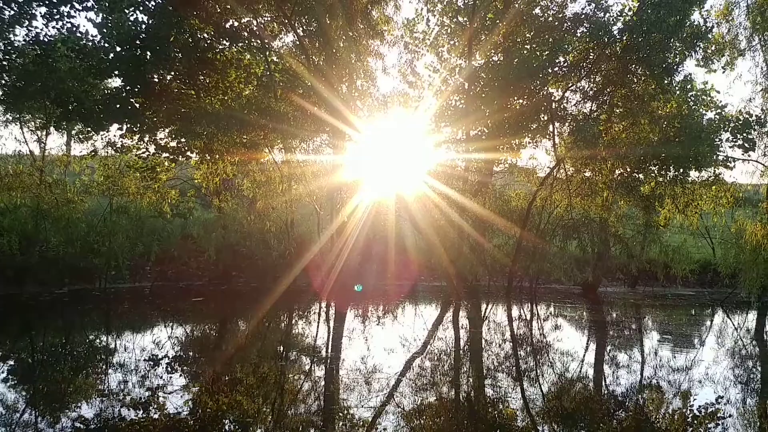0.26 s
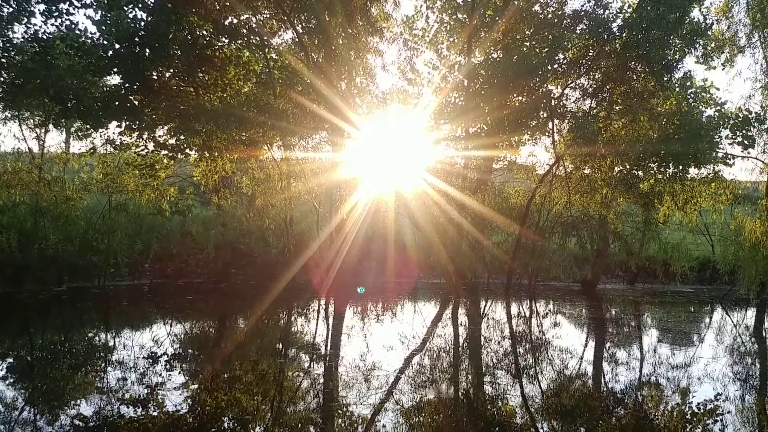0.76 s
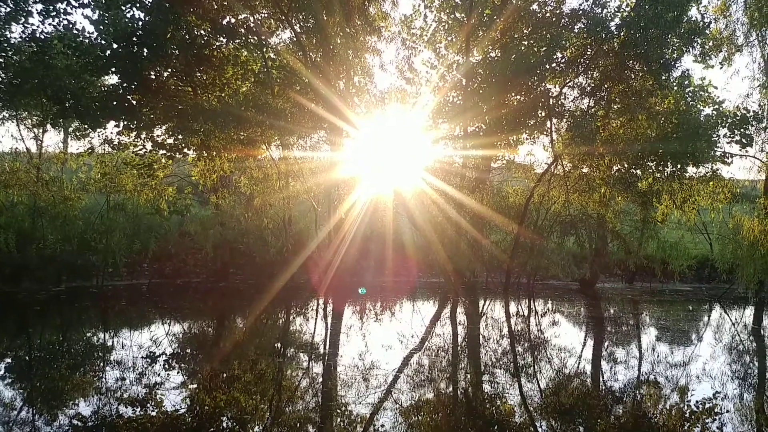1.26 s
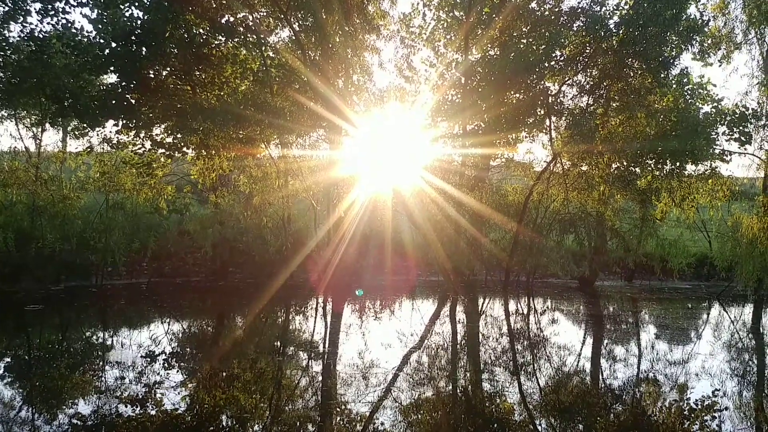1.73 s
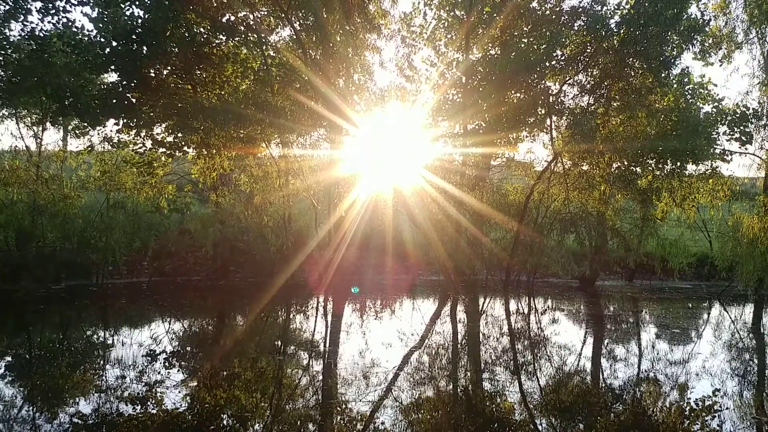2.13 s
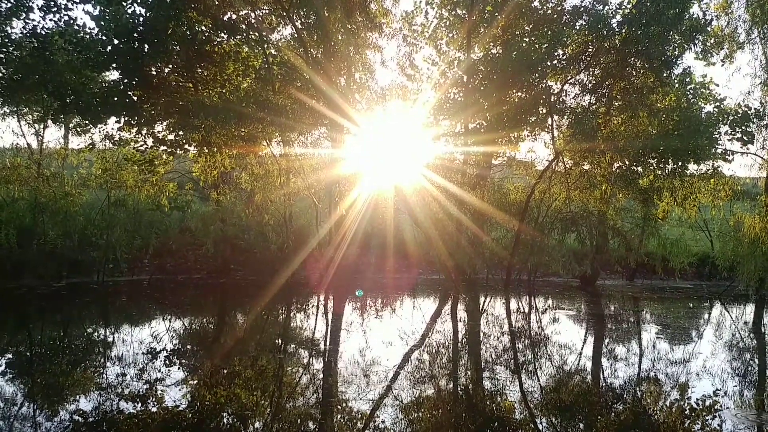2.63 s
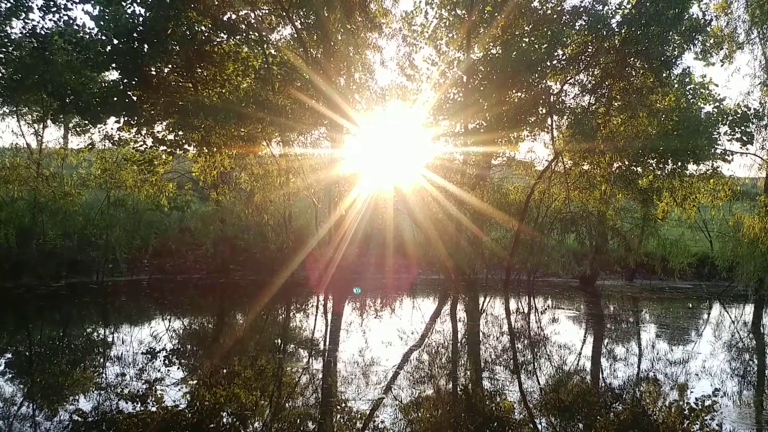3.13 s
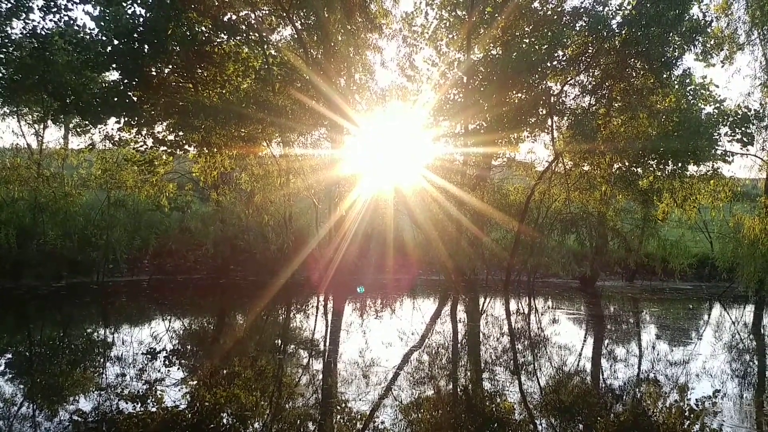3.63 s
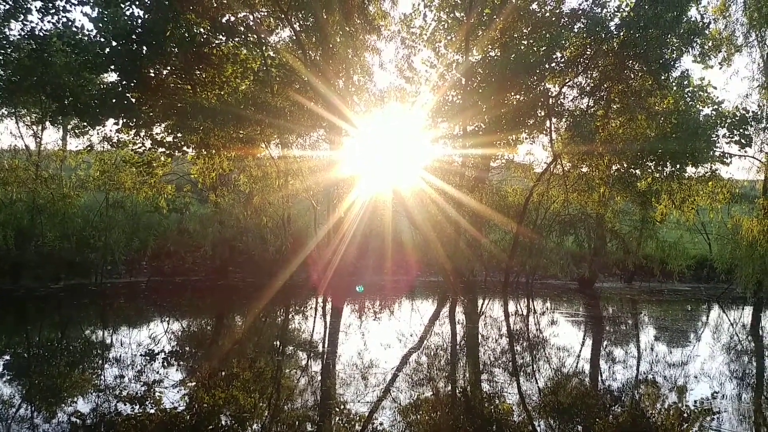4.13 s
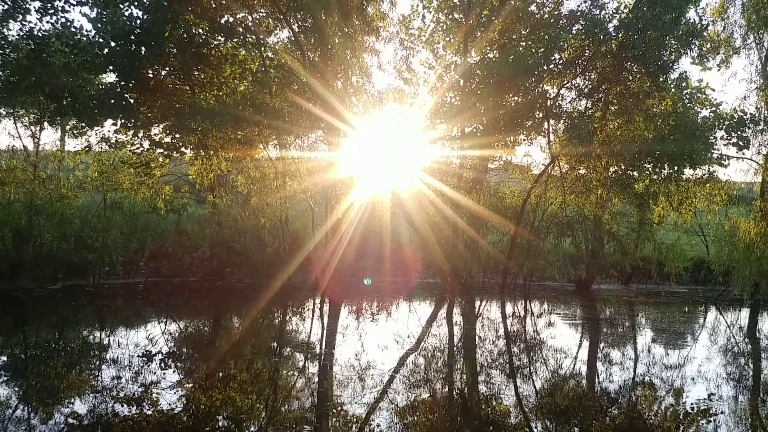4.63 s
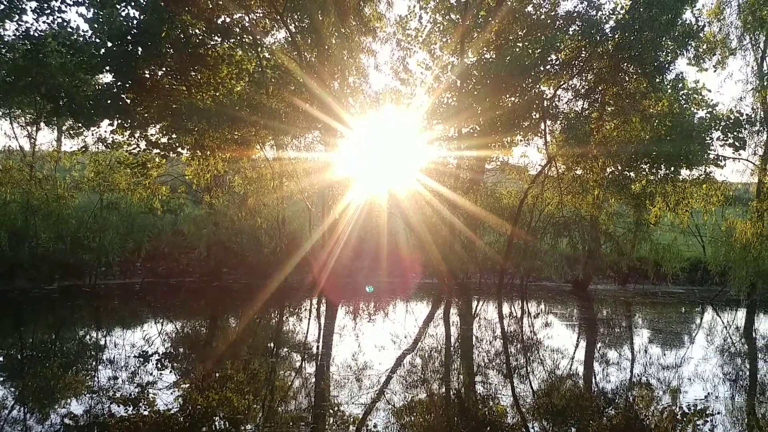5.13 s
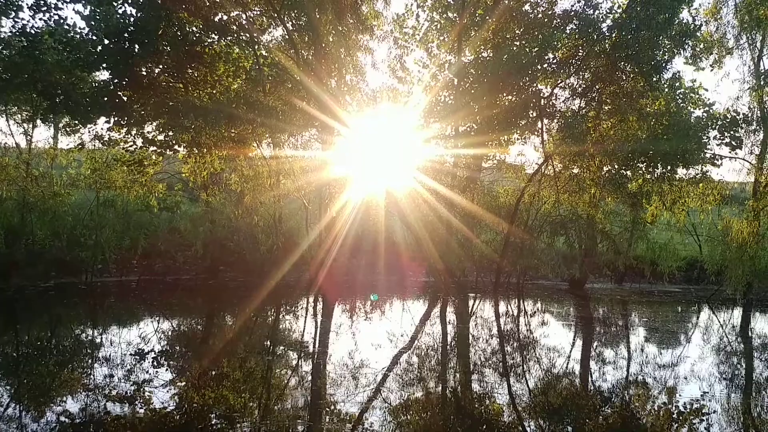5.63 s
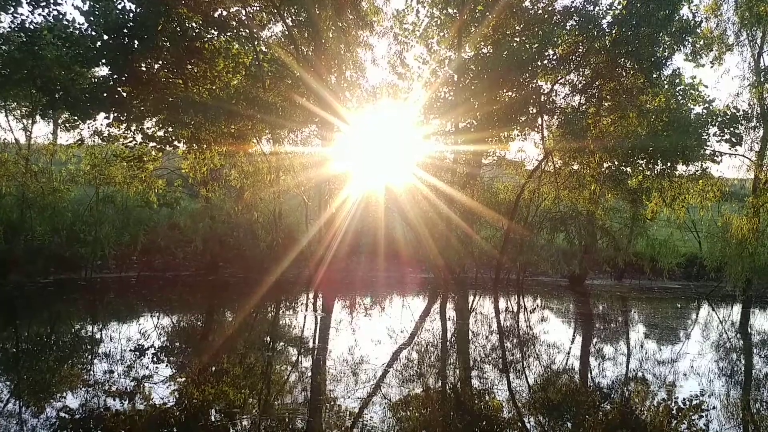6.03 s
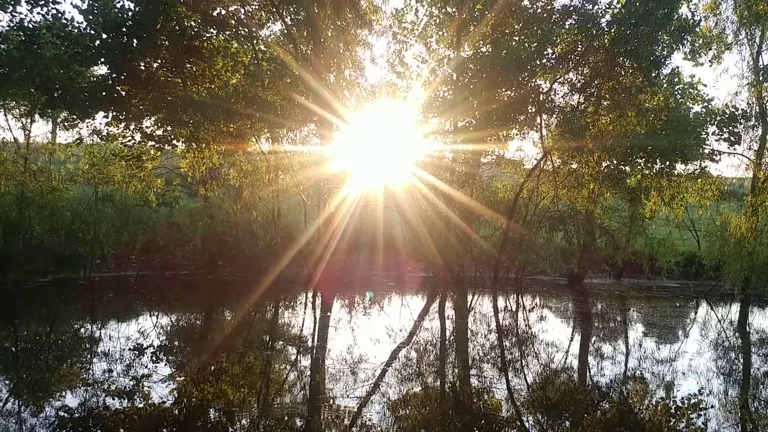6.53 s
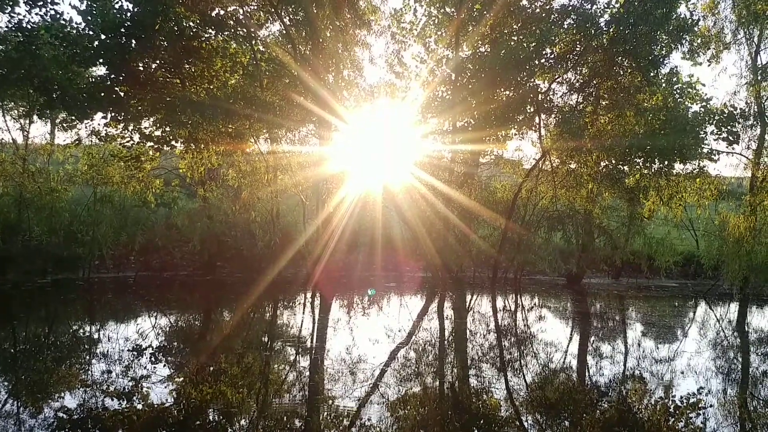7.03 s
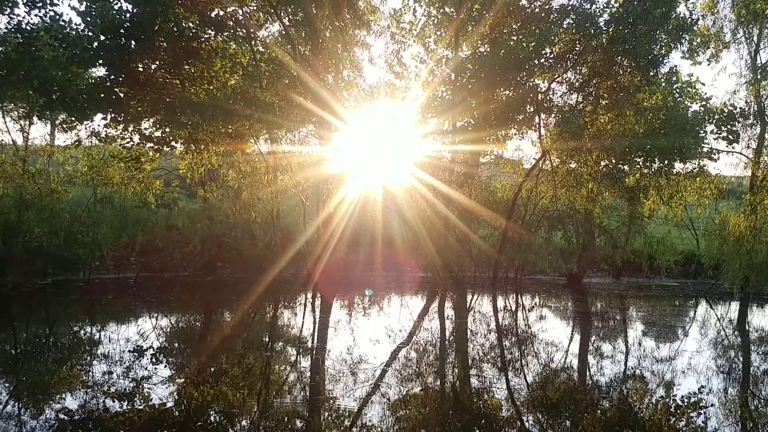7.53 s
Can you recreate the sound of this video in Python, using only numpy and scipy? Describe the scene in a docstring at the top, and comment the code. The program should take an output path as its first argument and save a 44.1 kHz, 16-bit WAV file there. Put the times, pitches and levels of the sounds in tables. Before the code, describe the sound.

Cicadas buzz high and steady by a pond, a near one swelling then holding, with a faint cricket and one distant crow caw.

```python
"""Evening at a pond among trees

A far chorus of cicadas buzzes; a near one warms up in swells, then holds its song, and a neighbour joins.
Their sound is a train of clicks from buckling ribs, coloured by the resonances of the belly.
A katydid throbs and a far cricket chirps, both by rubbing their wings. A crow calls once, water plops,
a brief tone blips, and far traffic rumbles and whines. Trees add echoes. The treble differs between
left and right, and the right side falls silent above about 13 kHz."""
import sys
import numpy as np
from scipy import signal
from scipy.fft import rfft, irfft, next_fast_len
from scipy.io import wavfile
from scipy.ndimage import map_coordinates

SR = 44100
rng = np.random.default_rng(int(sys.argv[2]) if len(sys.argv) > 2 else 0)


def persist_wave(psi):
    """Save psi, clipped to +-1, as 16-bit WAV."""
    counts = np.round(np.clip(psi, -1, 1) * 32767).astype(np.int16)
    wavfile.write(sys.argv[1], SR, np.atleast_2d(counts).T)


N = 342657

# The near cicada's muscle cycle (both drums buckle once), slowing as the song settles: time_s, rate_hz
MUSCLE_CYCLE = [(1.6, 157.6), (2.6, 157.2), (3.3, 155.5), (3.65, 156.1), (3.95, 152.8), (4.3, 152.4),
                (7.77, 152.2)]


def amp(db):
    """Decibels as an amplitude ratio."""
    return 10 ** (np.asarray(db) / 20)


def unit(x):
    """Scaling to unit RMS."""
    return x / np.sqrt(np.mean(x ** 2) + 1e-20)


def along(points, hz):
    """Interpolation of (frequency_hz, value) points on a log frequency axis."""
    f, v = np.transpose(points)
    return np.interp(np.log(hz + 1), np.log(f + 1), v)


def curves(rows):
    """Linear interpolation of each column after time_s, one value a sample."""
    s, *cols = np.transpose(rows)
    return [np.interp(np.arange(N) / SR, s, c) for c in cols]


def wobble(rate_hz):
    """Smooth random modulation: a spline through rate_hz knots a second."""
    coarse = np.arange(0, N + 32, 32)
    knots = rng.standard_normal(int(N * rate_hz / SR) + 4)
    return np.interp(np.arange(N), coarse, map_coordinates(knots, [coarse * rate_hz / SR]))


def filtered(x, response):
    """Linear filtering: the spectrum times a complex frequency response."""
    m = next_fast_len(N + SR // 2)
    return irfft(rfft(x, m) * response(np.fft.rfftfreq(m, 1 / SR)), m)[..., :N]


def among_trees(x, lag_s, wet_db):
    """Delay and scattering: x reaches the right later; trunks and leaves give each side its own tail."""
    # Reverberation time: frequency_hz, t60_s
    decay = [(500, 0.166), (2000, 0.68), (8000, 0.165)]
    hz, t, noise = signal.stft(rng.standard_normal((2, SR // 2)), SR, nperseg=256)
    tail = signal.istft(noise * amp(-60 * t / along(decay, hz)[:, None]), SR, nperseg=256)[1]
    wet = signal.fftconvolve(np.atleast_2d(x), tail / np.linalg.norm(tail[0]), axes=1)[:, :N]
    direct = filtered(x, lambda f: np.exp(-2j * np.pi * f * np.array([[0], [lag_s]])))
    return direct + amp(wet_db) * wet


def traffic():
    """Narrow-band engine hum over broadband rumble and air, coherent between the sides only in the bass."""
    # Engine hum: time_s, level_db
    hum_level = [(0, -65), (.56, -60), (1, -68), (1.7, -58), (1.9, -66), (3.35, -59), (4.7, -58),
                 (4.8, -65), (5.13, -57), (5.63, -66), (6.2, -59), (6.4, -65), (7.12, -59), (7.77, -62)]
    # Spectrum of rumble and air: frequency_hz, relative_db
    spectrum = [(15, -64), (30, -18.5), (50, -6.5), (70, -3.5), (110, -5.5), (180, -12.5), (295, -24.5),
                (540, -23.5), (1000, -28), (1650, -57), (2550, -30.5), (3500, -56)]
    # Likeness of left and right: frequency_hz, correlation
    coherence = [(60, 0.976), (150, 0.975), (300, 1), (600, 0.22), (1500, 0.026)]
    spread = lambda hz: np.arccos(np.clip(along(coherence, hz), -1, 1)) / 2
    colour = lambda hz: amp(along(spectrum, hz)) * [np.cos(spread(hz)), np.sin(spread(hz))]
    mid, side = filtered(rng.standard_normal((2, N)), colour)
    drone = lambda hz: 1 / (1 + ((hz - 81) / 8) ** 2) + 0.069 / (1 + ((hz - 172) / 6) ** 2)
    hum = unit(filtered(rng.standard_normal(N) + 0.134 * rng.standard_normal((2, N)), drone))
    rumble = amp(-59.5 + 0.34 * wobble(3.08)) * unit(np.array([mid + side, mid - side]))
    return rumble + amp(curves(hum_level)[0]) * hum


def motor_whine(start_s=0.49, length_s=1.5, fundamental_hz=502, climb_hz_per_s=13):
    """Harmonics two and three of a distant motor glide upward, fading in and out."""
    t = np.arange(N) / SR - start_s
    phase = 2 * np.pi * np.cumsum(fundamental_hz + climb_hz_per_s * t + 2.15 * wobble(14)) / SR
    fade = np.sqrt(np.abs(np.sin(np.pi * np.clip(t / length_s, 0, 1))))
    return fade * amp(-82 + 1.5 * wobble(11.4)) * (np.sin(3 * phase) + 0.5 * np.sin(2 * phase))


def plop(start_s=3.41, pitch_hz=510, t60_s=.15):
    """A damped oscillation, rising slightly in pitch: one soft plop from the water."""
    t = np.clip(np.arange(N) / SR - start_s, 0, 1)
    envelope = amp(-63 - 60 * t / t60_s) * (1 - np.exp(-t / .004))
    return envelope * np.sin(2 * np.pi * pitch_hz * t * (1 + .6 * t))


def tone_blip(start_s=7.187, length_s=0.0265, pitch_hz=3100):
    """A sine under a half-sine envelope: one brief tone blip."""
    t = np.clip(np.arange(N) / SR - start_s, 0, length_s)
    return amp(-51) * np.sin(np.pi * t / length_s) * np.sin(2 * np.pi * pitch_hz * t)


def crow(start_s=4.046, attack_s=0.0243, hold_s=0.12, release_s=0.033, top_s=4.125, top_hz=598):
    """A harmonic series on an arched pitch, made hoarse by random modulation; the far bank reflects it."""
    # Partials of the voice: harmonic, relative_db
    throat = [(1, -13.5), (2, 2.5), (3, 1), (4, -12.5)]
    t = np.arange(N) / SR
    pitch_hz = np.clip(top_hz - 125 * (10 * (t - top_s)) ** 2, 0, None)
    breath = np.interp(t - start_s, np.cumsum([0, attack_s, hold_s, release_s]), [0, 1, 1, 0])
    phase = 2 * np.pi * np.cumsum(pitch_hz) / SR + 0.15 * wobble(130)
    voice = breath * sum(amp(-47.5 + db + 2.2 * wobble(45)) * np.sin(k * phase) for k, db in throat)
    bank_echo = amp(-11) * np.roll(voice, round(.075 * SR))
    return among_trees(voice + bank_echo, lag_s=0.00036, wet_db=-10)


def cricket(stroke_s=0.045, spacing_s=.056):
    """Stridulation: three raspy wing strokes a chirp, the last faint, the tone sinking through each."""
    # Chirps: time_s, level_db, nominal_pitch_hz
    chirps = [(0.1994, -66, 2330), (0.7557, -63.5, 2311), (1.0221, -61, 2330), (1.2765, -61, 2297),
              (1.5424, -62, 2333), (2.3136, -67, 2380), (2.594, -59, 2367), (2.842, -60.5, 2330),
              (3.1093, -59.5, 2360), (3.4, -61.5, 2307), (4.0297, -59, 2322), (4.2976, -60, 2361),
              (4.562, -60.5, 2350)]
    song, t = np.zeros(N + SR), np.arange(int(stroke_s * SR)) / SR
    envelope = np.sqrt(np.abs(np.sin(np.pi * t / t[-1])))
    for time_s, db, hz in chirps:
        for k, stroke_db in enumerate([0, -.5, -10]):
            stroke_hz = hz + rng.normal(0, 15.3)
            tone = np.sin(2 * np.pi * stroke_hz * (1.02 * t - rng.uniform(0.281, 0.574) * t * t))
            onset = round((time_s - .006 + spacing_s * k) * SR)
            song[onset:][:len(t)] += amp(db + stroke_db) * envelope * tone
    rasp = 0.89 + 0.568 * wobble(330)
    return among_trees(song[:N] * rasp, lag_s=0.00034, wet_db=-11)


def katydid(throb_hz=10.19, resonance_hz=10300):
    """Amplitude modulation: a wing rasp in one broad resonance, pressed at a steady beat."""
    # The rasp: time_s, level_db
    level = [(0, -50), (1.3, -39.5), (2, -41.5), (2.8, -43.5), (4.5, -40), (6.2, -35), (7.77, -34.5)]
    beat = throb_hz * (np.arange(N) / SR - .027) + 0.067 * wobble(1.88)
    press = 0.5 + (.5 + .5 * np.cos(2 * np.pi * beat)) ** 2
    rasp = press * amp(2.66 * wobble(7.3)) * rng.standard_normal((2, N))
    resonance = lambda hz: 1 / (1 + ((hz - resonance_hz) / 800) ** 4)
    return amp(curves(level)[0]) * unit(filtered(rasp, resonance))


def drums(cycle_hz, second_drum_cycles, noise_share, jitter_cycles):
    """Impulse excitation: each buckling rib of a cicada's two drums gives a click and a puff of noise."""
    # The two ribs of a drum: delay_cycles, relative_db
    ribs = [(0, 0), (.24, -7)]
    cycles = np.cumsum(cycle_hz) / SR + rng.random()
    clicks, puffs = np.zeros(N + 16), np.zeros(N)
    taps = np.arange(-7, 9)
    for start in (0, second_drum_cycles):
        for delay, db in ribs:
            phase = cycles - start - delay
            whole = np.arange(np.ceil(phase[8]), phase[-1])
            buckles = whole + jitter_cycles * rng.standard_normal(len(whole))
            at = np.clip(np.interp(buckles, phase, np.arange(N)), 8, N)
            spots = at.astype(int)[:, None] + taps
            gap = spots - at[:, None]
            size = amp(db + 0.62 * rng.standard_normal(len(whole)))[:, None]
            pulses = size * np.sinc(gap) * np.cos(np.pi * gap / 16) ** 2  # band-limited impulses
            clicks += np.bincount(spots.ravel(), pulses.ravel(), N + 16)
            puffs += amp(db) * np.exp(-((phase % 1 - .2) / .085) ** 2)
    # the clicks keep their shape best around the belly's lowest resonance
    belly = filtered(unit(clicks[:N]), lambda hz: .5 + 0.154 / (1 + ((hz - 4100) / 700) ** 4))
    air = rng.standard_normal((2, N)) + 0.38 * rng.standard_normal(N)  # scatters differently to each side
    return np.sqrt(1 - noise_share) * belly + np.sqrt(noise_share) * unit(puffs * air)


def far_chorus(singers=5):
    """Incoherent summation: cicadas at their own rates and places, blurred by reverberation."""
    # Colour of the chorus: frequency_hz, relative_db
    spectrum = [(2400, -45.5), (3230, -32.5), (3330, -19.5), (3650, -13), (4200, -10), (4360, -7.5),
                (4550, -9.5), (5200, -20.5), (6300, -16), (7700, 2), (8500, -2.5), (9100, -20), (10300, -2),
                (11700, 0), (12900, -10), (14000, -38), (15500, -26)]
    # The whole chorus: time_s, level_db
    level = [(0, -26), (.35, -29), (1.4, -29.5), (2.4, -30), (3.3, -30.5), (4, -33), (7.77, -28)]
    crowd = 0
    for pace, side in rng.standard_normal((singers, 2)):
        cycle_hz = (157 + 6 * pace) * (1 + .004 * wobble(.7))
        buzz = drums(cycle_hz, second_drum_cycles=.51, noise_share=0.78, jitter_cycles=0.002)
        flicker = amp(1.35 * wobble(2.995) + 1.67 * wobble(9))
        crowd = crowd + among_trees(flicker * buzz, lag_s=0.0004084 * (1 + 0.082 * side), wet_db=2)
    return amp(curves(level)[0]) * unit(filtered(crowd, lambda hz: amp(along(spectrum, hz))))


def partials(fundamental_hz, table, flicker_db, blur_rad):
    """Line broadening: each (harmonic, level_db) partial flickers in level and phase on its own."""
    phase = 2 * np.pi * np.cumsum(fundamental_hz) / SR
    return sum(amp(db + flicker_db * wobble(14)) * np.sin(k * phase + blur_rad * wobble(22))
               for k, db in table)


def belly_tones(effort, neighbour_hz=153.3):
    """Resonance: thin, broken tones ring out of the near cicada, its neighbour and one far singer."""
    # The near cicada's upper and low partials: harmonic, relative_db
    upper_tones = [(24, -9), (26, -13), (28, -1.5), (29, -7), (33, -9)]
    low_tones = [(18, -44), (19, -61), (20, -40.5), (22, -39)]
    # How clearly its belly rings on the upper ones: time_s, gain_db
    ringing = [(2, -20), (3.3, -13), (3.75, -14.5), (3.92, -23), (4.02, -11.5), (4.18, -12.5), (4.28, -24),
               (4.36, -12), (4.65, -11.5), (5.3, -14), (5.8, -17), (6.3, -17), (6.75, -17.5), (7.77, -19)]
    # The neighbour's partials: harmonic, relative_db
    neighbour_tones = [(24, -3), (25, -1), (27, 2), (31, -2)]
    # The neighbour joining in: time_s, level_db
    neighbour_level = [(4.5, -75), (5.5, -50), (6.5, -46), (7.77, -49)]
    # The far singer's belly ring, clearest early on: time_s, pitch_hz, level_db
    far_ring = [(0, 4390, -52), (.7, 4385, -52), (1.2, 4365, -52), (1.7, 4345, -53), (2.2, 4340, -63),
                (7.77, 4340, -70)]
    cycle_hz, = curves(MUSCLE_CYCLE)
    upper = amp(curves(ringing)[0]) * partials(cycle_hz, upper_tones, flicker_db=2.5, blur_rad=0.92)
    low = partials(cycle_hz, low_tones, flicker_db=3.5, blur_rad=1.94)
    neighbour = partials(np.full(N, neighbour_hz), neighbour_tones, flicker_db=1.5, blur_rad=1)
    neighbour *= amp(curves(neighbour_level)[0])
    ring_hz, ring_db = curves(far_ring)
    far = amp(ring_db) * partials(ring_hz, [(1, 0)], flicker_db=4.5, blur_rad=3.2)
    return among_trees(effort * (upper + low) + neighbour + far, lag_s=0.00027, wet_db=-9)


def cicada_effort(fade_db=9, flutter_db=0.29):
    """Amplitude envelope of the near cicada: warm-up swells and held song add in power."""
    # Long swells, each followed by a short burst: peak_s, rise_s, fall_s, peak_db
    swells = [(1.85, 0.086, 0.115, -28.5), (2.035, 0.029, 0.045, -30), (2.225, 0.073, 0.09, -25),
              (2.375, 0.02, 0.052, -28.5), (2.59, 0.12, 0.082, -25.5), (2.74, 0.031, 0.033, -28),
              (2.95, 0.15, 0.088, -27), (3.068, 0.019, 0.0346, -26.5), (3.27, 0.15, 0.097, -26.5),
              (3.39, 0.013, .045, -28)]
    # The held song: time_s, level_db
    song = [(3.38, -42), (3.45, -28.5), (3.55, -25.5), (4.1, -25), (4.8, -25), (5.5, -24.5), (6.2, -25.5),
            (6.8, -24.5), (7.3, -25), (7.77, -25.5)]
    t = np.arange(N) / SR
    swell_power = sum(amp(db - fade_db * ((t - s) / np.where(t < s, rise, fall)) ** 2) ** 2
                      for s, rise, fall, db in swells)
    song_power = amp(curves([(3.3, -97)] + song)[0]) ** 2
    return np.sqrt(swell_power + song_power) * amp(flutter_db * wobble(14))


def near_cicada(effort, bounce_s=.00642, bounce_gain=0.338):
    """Comb filtering: the buzz interferes in the treble with its own reflection off the water."""
    # Colour of the buzz: frequency_hz, relative_db
    spectrum = [(1470, -49.5), (2500, -51.5), (2980, -37), (3220, -61), (3300, -25), (3690, -12),
                (4400, -6), (5290, -14), (5840, -18.5), (7400, 5.5), (7660, 1), (8100, 5.5), (8500, -3),
                (9090, -20), (10500, -1.5), (11400, 3), (15500, -35.5)]
    buzz = drums(curves(MUSCLE_CYCLE)[0], second_drum_cycles=.505, noise_share=0.37, jitter_cycles=.0038)
    buzz = among_trees(buzz, lag_s=.0003, wet_db=-6)
    comb = lambda hz: 1 + bounce_gain * (hz > 5500) * np.exp(-2j * np.pi * hz * bounce_s)
    colour = lambda hz: amp(along(spectrum, hz)) * comb(hz)
    return effort * amp([[.7], [-.7]]) * unit(filtered(buzz, colour))  # a little to the left


def scene():
    """Superposition of all sources; one effort drives the near cicada's buzz and tones."""
    effort = cicada_effort()
    insects = near_cicada(effort) + belly_tones(effort) + far_chorus() + katydid() + cricket()
    return insects + crow() + motor_whine() + plop() + tone_blip() + traffic()


def record(dry, top_hz=15680):
    """Left-right treble balance and band limit; the right side falls silent above about 13 kHz."""
    # Left side against right: frequency_hz, balance_db
    left_over_right = [(500, -0.5), (1150, -1.5), (1750, 0.5), (2400, 0.5), (4000, -2), (6000, -2),
                       (7000, -2), (7800, -10.5), (8700, -3), (9400, 17), (10200, 14.5), (11200, 11.5),
                       (12400, 12), (13000, 12), (13500, 27)]
    lean = lambda hz: np.arctan(amp(along(left_over_right, hz)))
    balance = lambda hz: np.sqrt(2) * np.array([np.sin(lean(hz)), np.cos(lean(hz))])
    return filtered(dry, lambda hz: balance(hz) * (hz < top_hz))


dry = scene()
out = record(dry)
persist_wave(out)
```